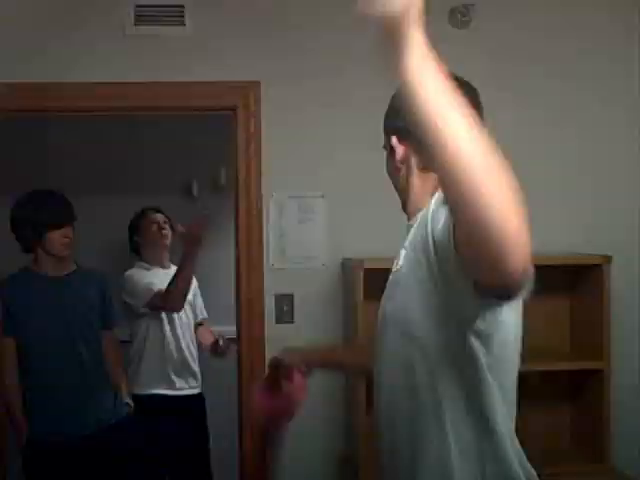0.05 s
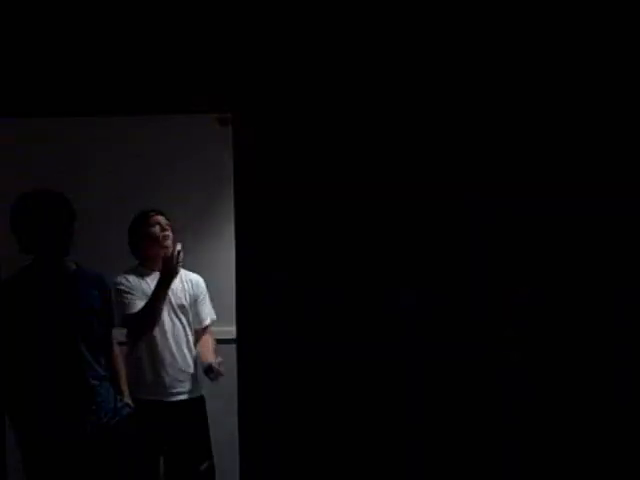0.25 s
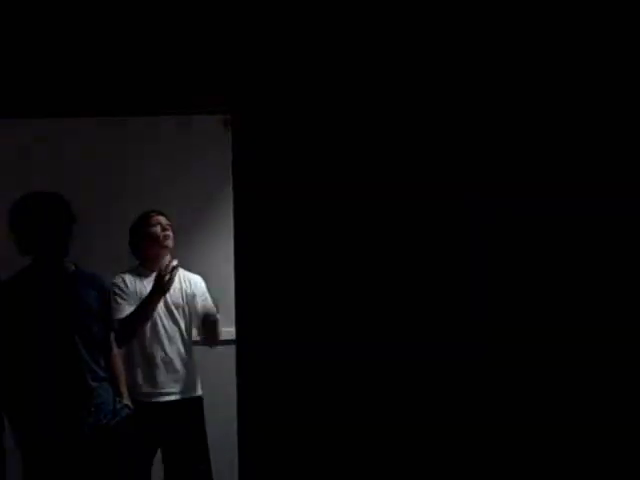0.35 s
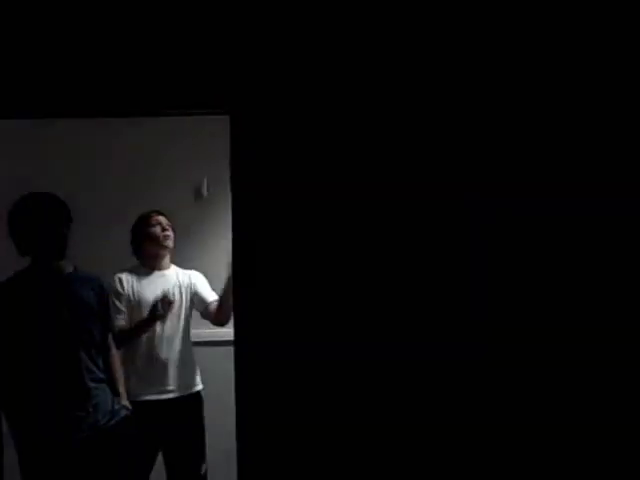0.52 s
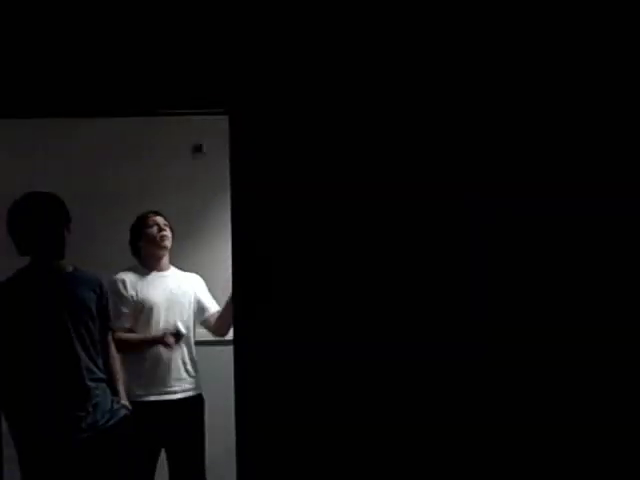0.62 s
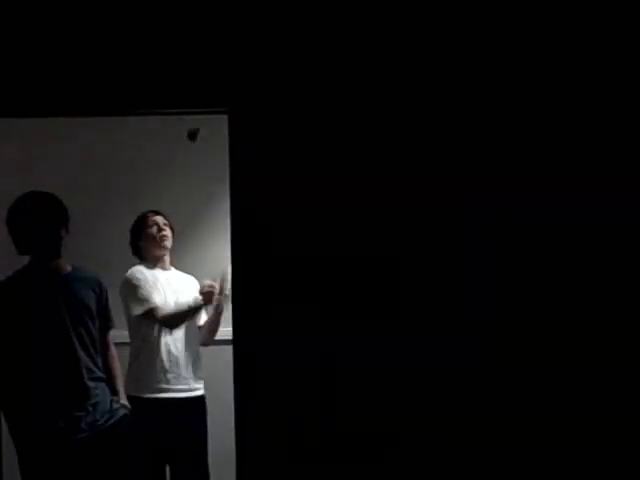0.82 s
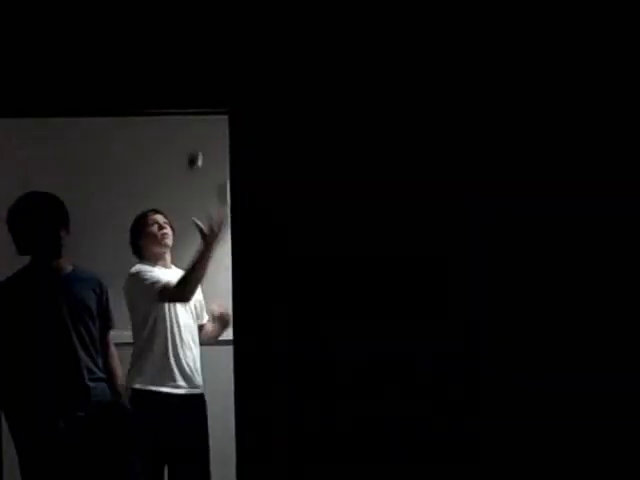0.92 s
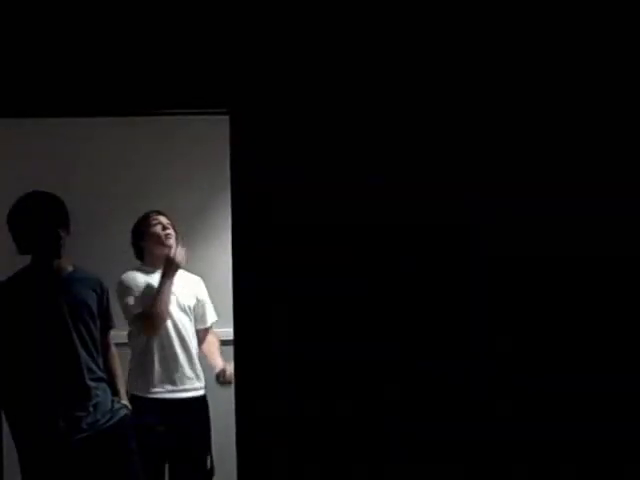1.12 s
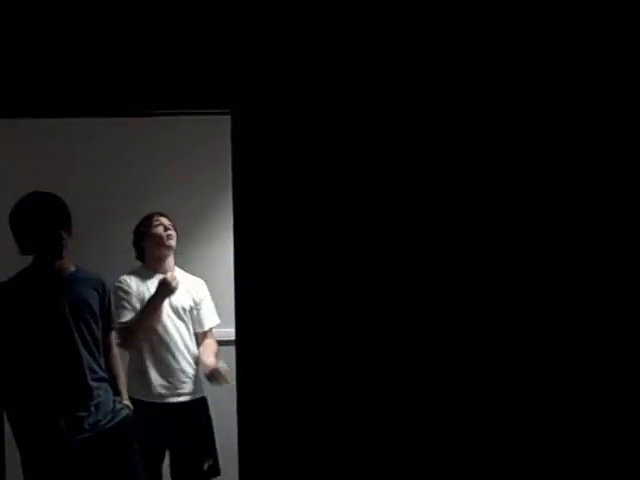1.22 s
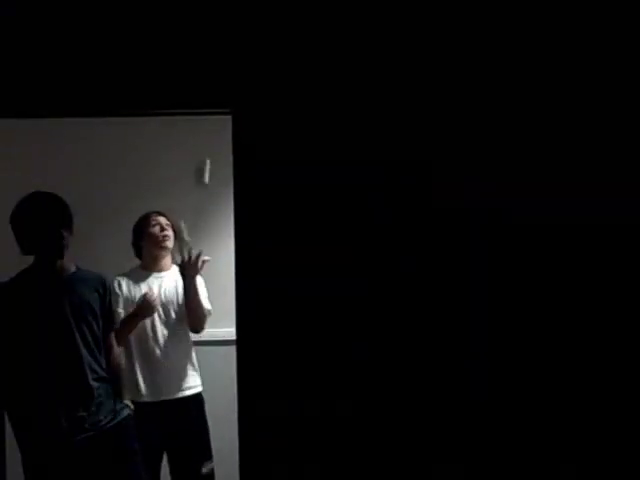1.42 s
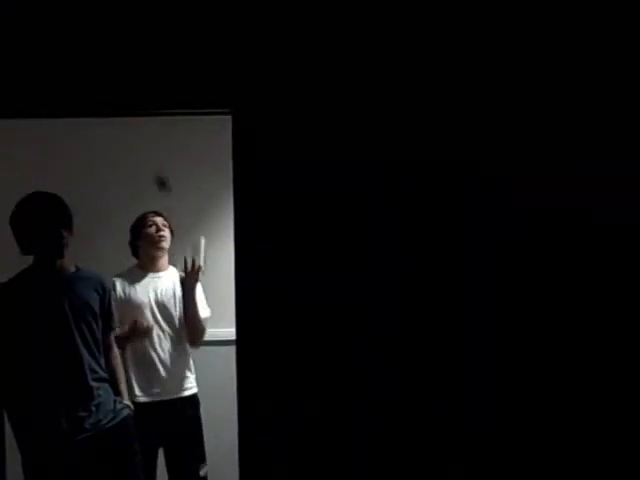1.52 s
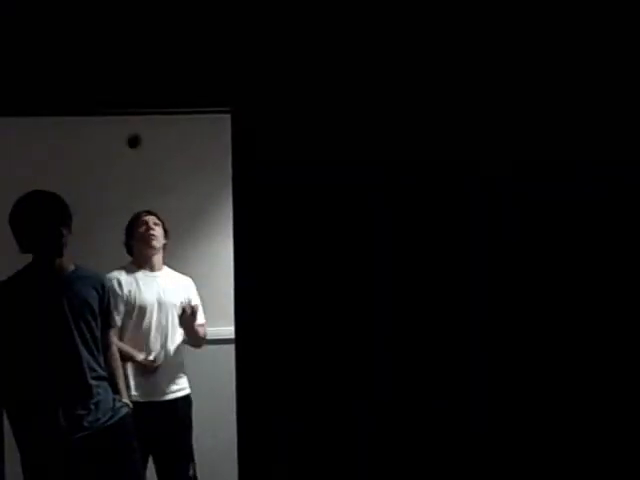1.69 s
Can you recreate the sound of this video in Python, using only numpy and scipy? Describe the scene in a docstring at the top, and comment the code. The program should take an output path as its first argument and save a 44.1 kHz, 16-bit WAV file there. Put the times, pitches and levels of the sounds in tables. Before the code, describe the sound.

A whipped towel swishes and cracks once, so loudly that the microphone overloads. The small bare room rings briefly, then faint taps of juggled objects and a dull thud follow over quiet ventilation noise.

```python
"""A towel whipped in a small bare room

The towel flaps, swishes and cracks so loudly that the microphone overloads. The room rings on, with
a hollow shelf humming near 1 kHz. Faint catches of juggled objects and a thud follow over ventilation
noise. The recorder turns itself down after the crack, then slowly creeps back up."""
import sys
import numpy as np
from scipy import signal
from scipy.io import wavfile
from scipy.ndimage import uniform_filter1d

SR = 44100
rng = np.random.default_rng(int(sys.argv[2]) if len(sys.argv) > 2 else 0)


def int16_out(signal):
    """Quantize to a 16-bit WAV file."""
    q = np.round(np.clip(np.atleast_2d(signal).T, -1, 1) * 32767)
    wavfile.write(sys.argv[1], SR, q.astype(np.int16))


N = 77175

# Tone of the ventilation: pitch_hz, relative_level_db
VENT_TONE = [(35, -32.5), (60, -1.5), (298, 1), (384, -1), (544, -9), (719, -14.5), (973, -11.5),
             (1350, -16), (1950, -19), (4610, -29.5), (15400, -38.5)]
# How the deep rumble rises and falls: time_s, level_db
RUMBLE_LEVELS = [(0.5, -52), (0.728, -63), (0.756, -49), (0.944, -75), (0.982, -53), (1.178, -71.5),
                 (1.21, -57), (1.588, -52.5), (1.75, -65)]
# Catches and flicks of cloth: start_s, middle_db, treble_db, top_db, fade_s
LIGHT_TAPS = [(0.0805, -33.5, -32.5, -37.5, 0.0094), (0.0845, -44, -59, -68, 0.025),
              (0.8209, -45, -53, -52, 0.068), (0.8612, -45, -54, -49, 0.037), (.878, -57, -62, -59, 0.045),
              (1.2062, -68, -51.5, -52, 0.047), (1.2195, -63, -61, -57, 0.032),
              (1.254, -59, -67, -52, 0.039), (1.3565, -51, -49.5, -51.5, 0.048),
              (1.367, -45, -54, -54, 0.05), (1.7144, -50, -46.5, -47.5, 0.044),
              (1.726, -56.5, -60, -58, 0.03)]
# Soft rustles of cloth: centre_s, width_s, dull_db, bright_db
CLOTH_RUSTLES = [(0, 0.049, -53.5, -65), (0.088, 0.021, -57.5, -63), (1.001, .03, -58.5, -75),
                 (1.095, .008, -63, -64), (1.34, 0.012, -61.5, -63), (1.53, 0.0049, -67, -66),
                 (1.654, 0.027, -64.5, -62)]
# Notes the hollow shelf rings at: pitch_hz, level_db, fade_s
SHELF_NOTES = [(892, -12.5, .33), (963, -10.5, 0.44), (992, -12.5, 0.16), (1014.4, -8, 0.34),
               (1027.5, -12, 0.21), (1031, -8.5, .32), (1055.8, -6.5, .36)]
# Tone of the crack's echoes: pitch_hz, relative_level_db
ECHO_TONE = [(45, -36), (90, -32.5), (180, -26.5), (300, -23), (480, -21.5), (680, -9.5), (900, -12),
             (1300, -10.5), (1800, -5), (2800, -6.5), (5000, -10.5), (9000, -14.5), (15400, -20)]
# How long the room rings: pitch_hz, fade_s
ROOM_FADES = [(100, .9), (250, 0.8), (500, .45), (1000, 0.46), (2000, .36), (5000, 0.34), (12000, 0.3)]

CRACK_S, THUD_S = 0.2206, 1.35   # when they happen
SHOCK_DB, SHOCK_LENGTH_S, ECHO_DB = 10.5, 0.00046, 5
SWISH_RISE_DB_PER_S = 497
LOUD_DB, CUT_SHARE, REACT_S, RECOVER_DB_PER_S = -26.5, 0.21, 0.035, 6.5   # automatic volume control
HISS_DB, CLIP_LEVEL = -70.5, 0.96


def from_db(db):
    """Turn decibels into a number to multiply by."""
    return 10 ** (np.asarray(db) / 20)


def unit_level(x):
    """Scale a sound to an average power of 1."""
    return x / np.sqrt(np.mean(x ** 2) + 1e-20)


def at_pitch(table, hz):
    """Read a table's value between its listed pitches."""
    pitches, values = np.transpose(table)
    return np.interp(np.log(hz), np.log(pitches), values)


def noise(low_hz, high_hz):
    """Noise between two pitches, skipping the start while the filter settles."""
    band = signal.butter(2, [low_hz, min(high_hz, 0.45 * SR)], "band", fs=SR, output="sos")
    return signal.sosfilt(band, rng.standard_normal(N + 8000))[8000:]


def drift(rate_hz):
    """A slow random wobble, about 1 in size."""
    memory = np.exp(-2 * np.pi * rate_hz * 40 / SR)   # one step every 40 samples
    steps = rng.standard_normal(N // 40 + 2002)
    slow = signal.lfilter([1], [1, -2 * memory, memory ** 2], steps)[2000:]
    return np.interp(np.arange(N) / 40, np.arange(len(slow)), unit_level(slow))


def strike(start_s, rise_s, fade_s):
    """The loudness of a hit: it rises quickly and falls 60 dB in fade_s."""
    age = np.maximum(np.arange(N) / SR - start_s, 0)
    return (1 - np.exp(-age / rise_s)) * from_db(-60 * age / fade_s)


def pitch_bands():
    """Bands a third of an octave wide: low_hz, high_hz, centre_hz."""
    edges = 45 * 2 ** np.arange(0, 8.8, 1 / 3)
    return [(low, high, np.sqrt(low * high)) for low, high in zip(edges, edges[1:])]


def background():
    """Moving air makes a slightly wavering rush; beneath it a deep rumble rises and falls."""
    shared_db = 0.8 * drift(3.4)
    air = sum(from_db(at_pitch(VENT_TONE, hz) + shared_db + 1.2 * drift(4.8)) * noise(low, high)
              for low, high, hz in pitch_bands())
    rumble_db = np.interp(np.arange(N) / SR, *np.transpose(RUMBLE_LEVELS))
    return from_db(-46) * unit_level(air) + from_db(rumble_db) * unit_level(noise(12, 33))


def thud():
    """A dull footstep booms in the room."""
    return from_db(-34) * strike(THUD_S, rise_s=0.014, fade_s=0.42) * unit_level(noise(50, 405))


def taps():
    """Each catch or flick is a short puff of noise with a fainter echo from the room."""
    bands = [unit_level(noise(low, high)) for low, high in [(600, 2500), (2500, 7000), (7000, 17000)]]
    out = np.zeros(N)
    for start_s, *levels_db, fade_s in LIGHT_TAPS:
        puff = strike(start_s, 0.0002, fade_s)
        echo = from_db(-14) * strike(start_s, rise_s=0.014, fade_s=0.3)
        out += (puff + echo) * sum(from_db(db) * band for db, band in zip(levels_db, bands))
    return out


def cloth():
    """The towel rustles softly and pushes air aside in a swish that swells into the crack."""
    t = np.arange(N) / SR
    dull, bright = unit_level(noise(1500, 5000)), unit_level(noise(5000, 17000))
    swell = from_db(SWISH_RISE_DB_PER_S * np.minimum(t - CRACK_S, 0)) * (t < CRACK_S)
    out = swell * (from_db(-42) * dull + from_db(-44.5) * bright)
    for centre_s, width_s, dull_db, bright_db in CLOTH_RUSTLES:
        hump = np.exp(-0.5 * ((t - centre_s) / width_s) ** 2)
        out += hump * (from_db(dull_db) * dull + from_db(bright_db) * bright)
    return out


def boom():
    """A deep shudder follows the crack and then drops out."""
    age = np.maximum(np.arange(N) / SR - CRACK_S, 0)
    level_db = -24.5 - 20 * (age / 0.16) ** 6   # falls away steeply near 0.16 s
    return from_db(level_db) * strike(CRACK_S, 0.0046, 1.5) * unit_level(noise(12, 94))


def shelf():
    """The crack sets a hollow shelf ringing at several close, wavering notes."""
    age = np.arange(N) / SR - CRACK_S
    phases = rng.uniform(0, 2 * np.pi, len(SHELF_NOTES))
    out = np.zeros(N)
    for (hz, db, fade_s), phase in zip(SHELF_NOTES, phases):
        note = np.sin(2 * np.pi * hz * age + phase)
        out += from_db(db + 4 * drift(15)) * note * strike(CRACK_S, 0.005, fade_s)
    return out


def room_echoes():
    """The crack bounces between bare walls; low pitches build up later and last longer."""
    bands = [(from_db(at_pitch(ECHO_TONE, hz)) * noise(low, high), hz) for low, high, hz in pitch_bands()]
    echoes = sum(band * strike(CRACK_S, 3.2 / hz, at_pitch(ROOM_FADES, hz)) for band, hz in bands)
    return from_db(ECHO_DB) * echoes / np.std(sum(band for band, hz in bands))


def crack():
    """The towel's tip makes an N-shaped jump in air pressure; its first echoes add a smack."""
    age = np.arange(N) / SR - CRACK_S
    shock = np.where((age >= 0) & (age < SHOCK_LENGTH_S), 1 - 2 * age / SHOCK_LENGTH_S, 0)
    smack = strike(CRACK_S, rise_s=0.00059, fade_s=0.11) * unit_level(noise(1404, 3200))
    return from_db(SHOCK_DB) * shock + from_db(3) * smack


def scene():
    """Add all the sounds into one channel."""
    whip = room_echoes() + shelf() + crack() + boom() + cloth()
    return (whip + taps() + thud() + background())[None]


def record(dry):
    """The recorder turns loud sound down, adds hiss, overloads and trims the lowest and highest pitches."""
    level_db = 10 * np.log10(uniform_filter1d(dry[0] ** 2, size=441, origin=220) + 1e-12)
    wanted_cut_db = CUT_SHARE * np.maximum(level_db - LOUD_DB, 0)
    recovery_db = RECOVER_DB_PER_S * np.arange(N) / SR
    cut_db = np.maximum.accumulate(wanted_cut_db + recovery_db) - recovery_db   # lets go slowly
    memory = np.exp(-1 / (REACT_S * SR))
    sound = dry * from_db(-signal.lfilter([1 - memory], [1, -memory], cut_db))
    hiss = from_db(HISS_DB) * rng.standard_normal(N)
    sound = np.clip(sound + hiss, -CLIP_LEVEL, CLIP_LEVEL)
    sound += 0.042 * sound ** 2   # the overload is slightly lopsided
    bass_cut = signal.butter(1, 5.3, "high", fs=SR, output="sos")
    top_cut = signal.ellip(12, 0.3, 70, 15500, fs=SR, output="sos")
    return signal.sosfilt(top_cut, signal.sosfilt(bass_cut, sound))


dry = scene()
out = record(dry)
int16_out(out)
```